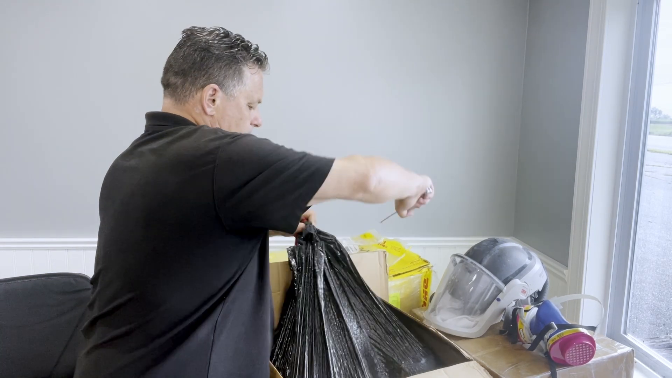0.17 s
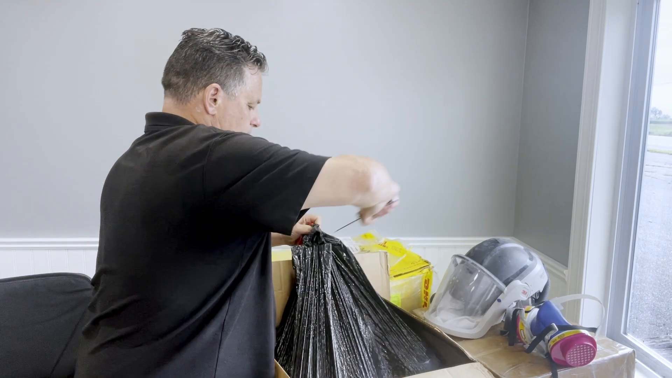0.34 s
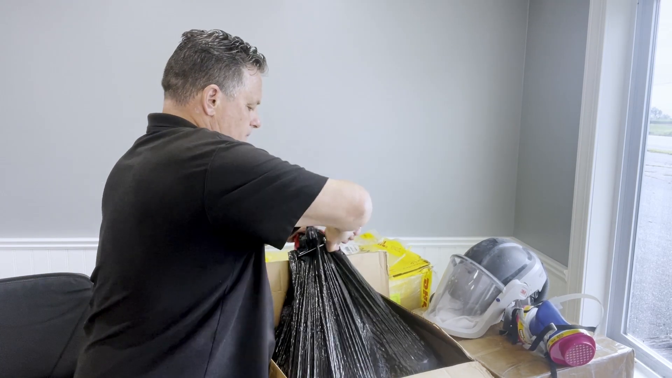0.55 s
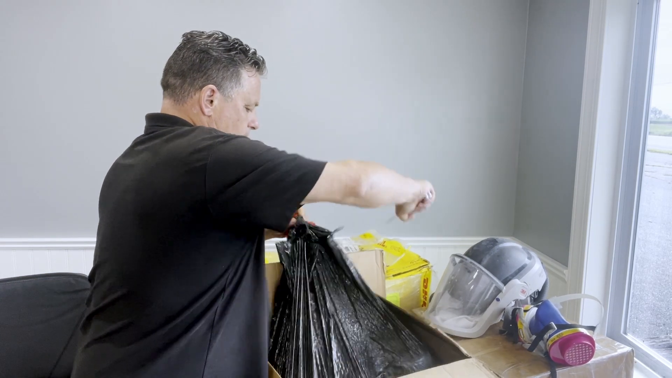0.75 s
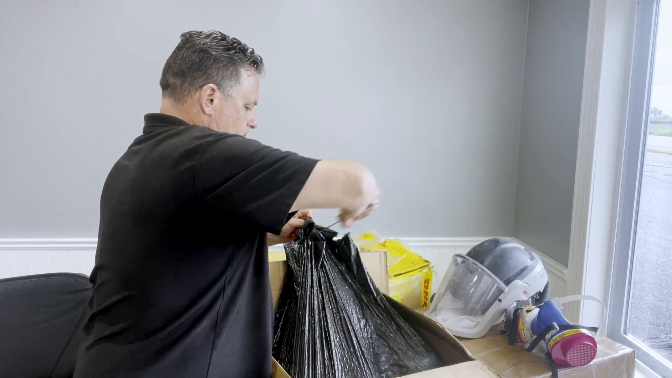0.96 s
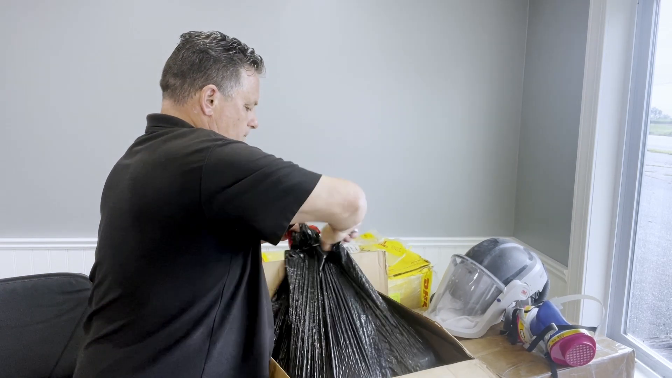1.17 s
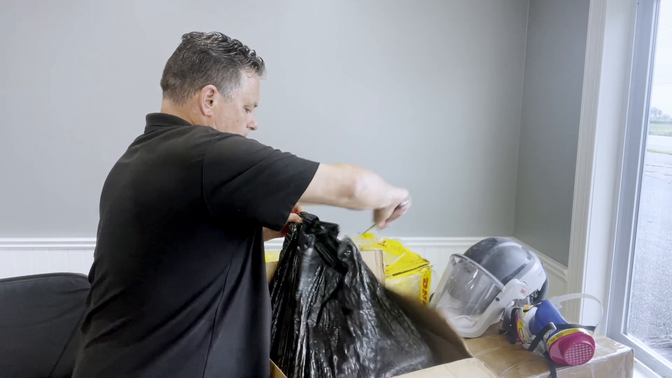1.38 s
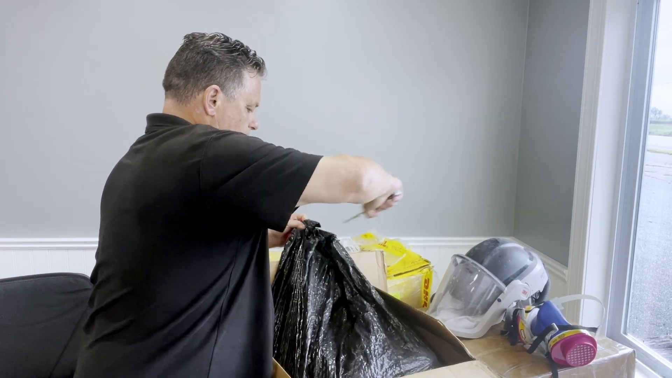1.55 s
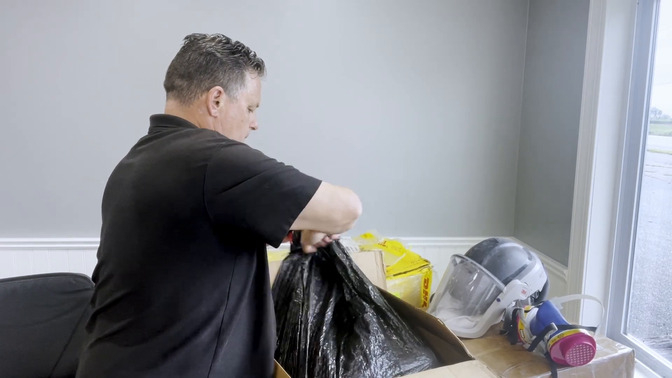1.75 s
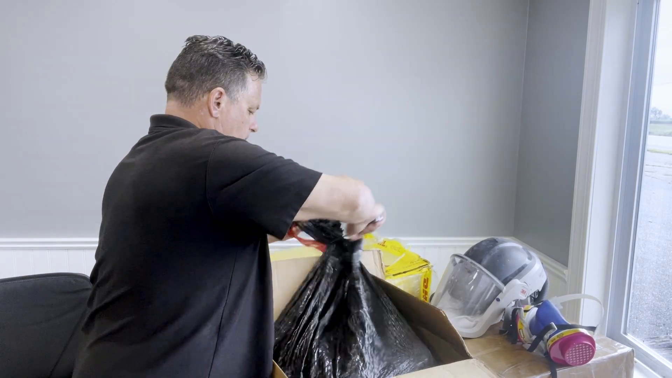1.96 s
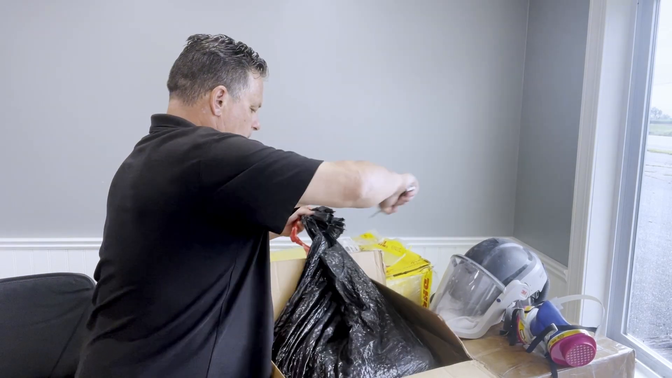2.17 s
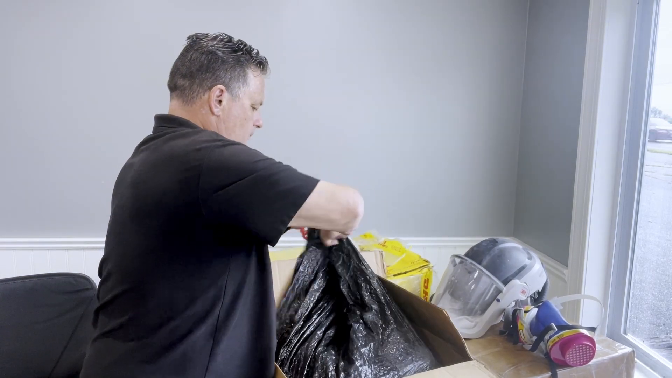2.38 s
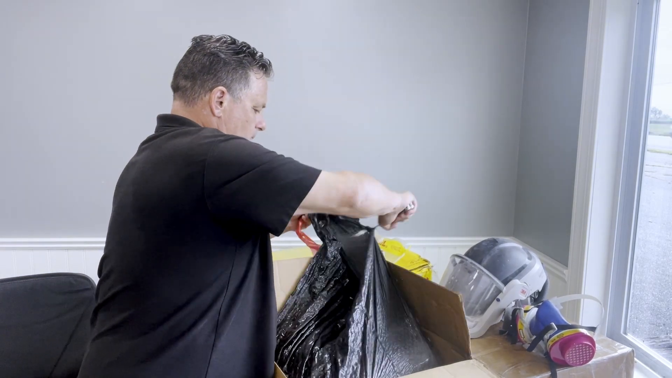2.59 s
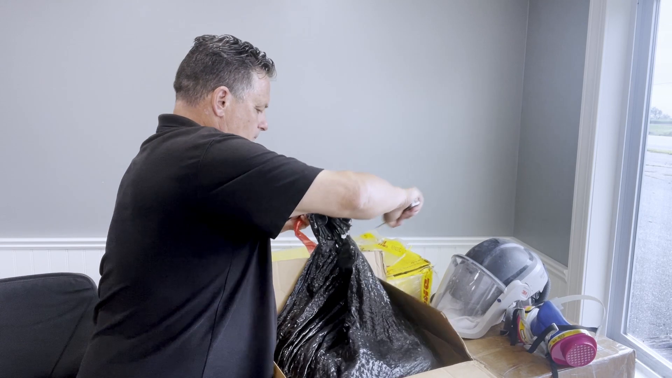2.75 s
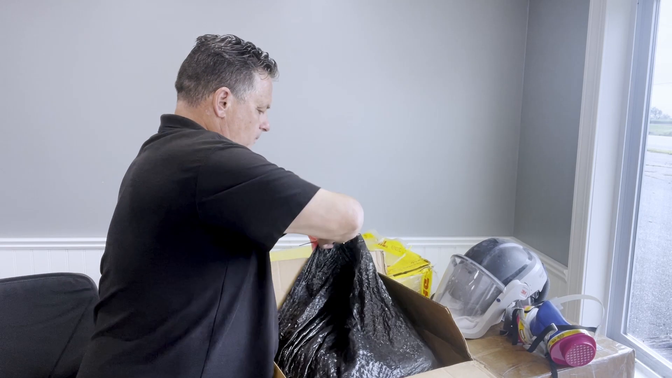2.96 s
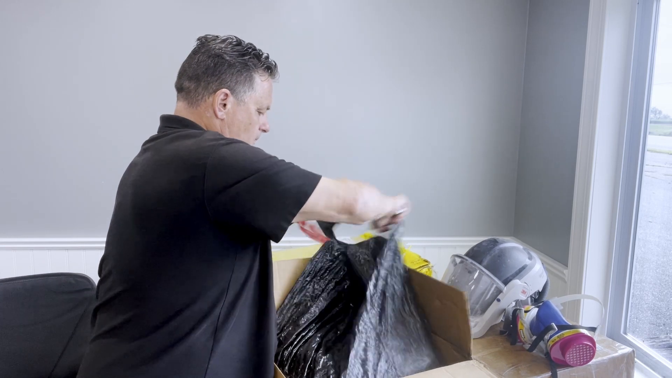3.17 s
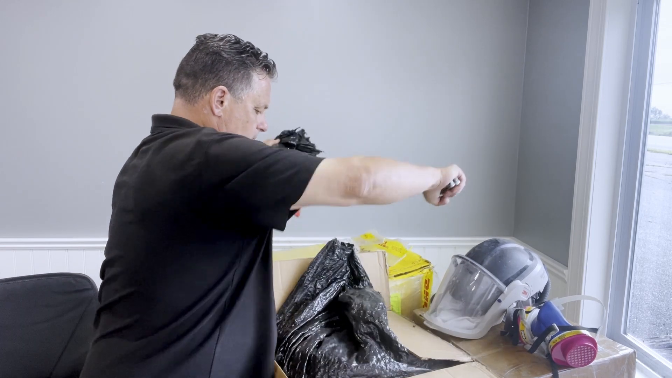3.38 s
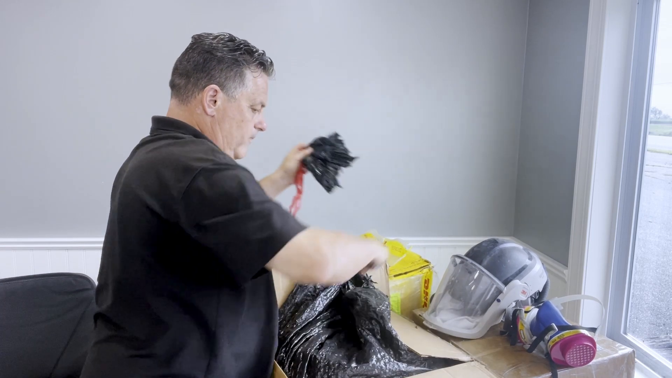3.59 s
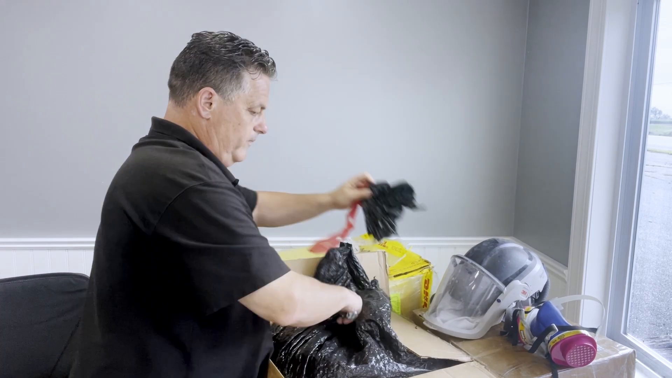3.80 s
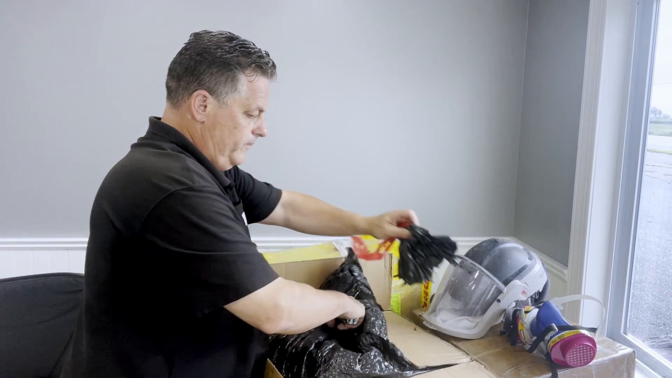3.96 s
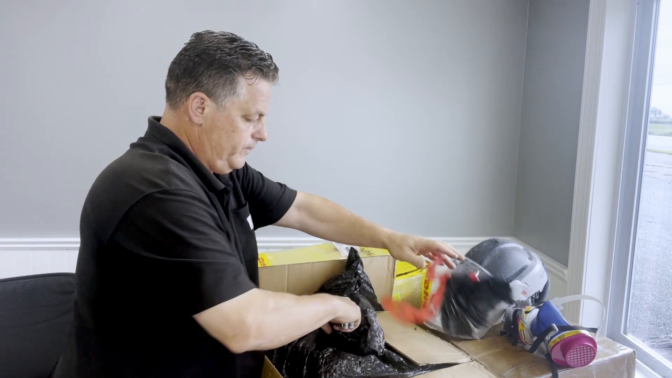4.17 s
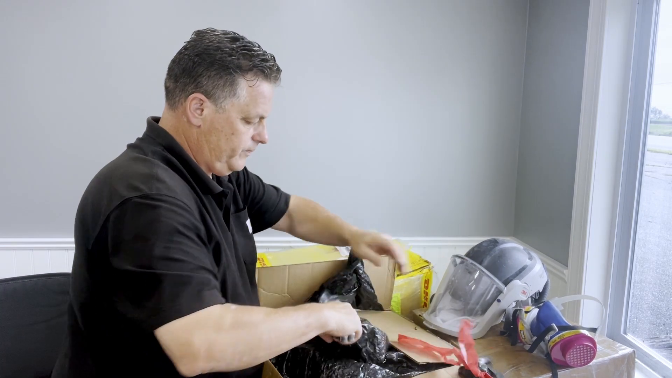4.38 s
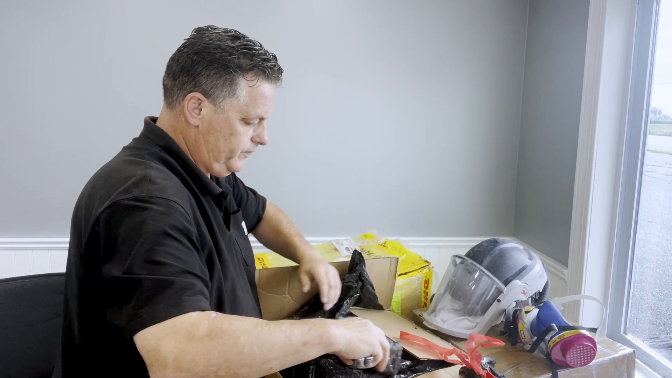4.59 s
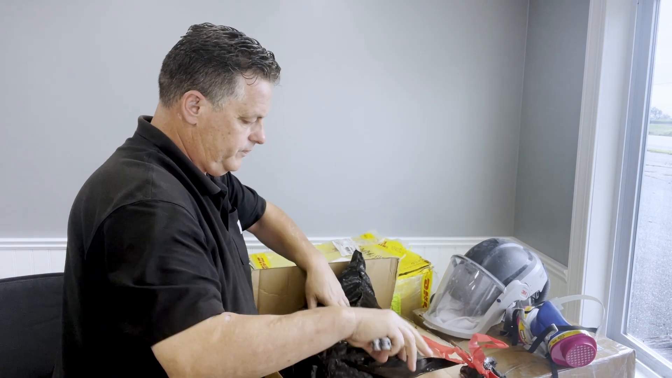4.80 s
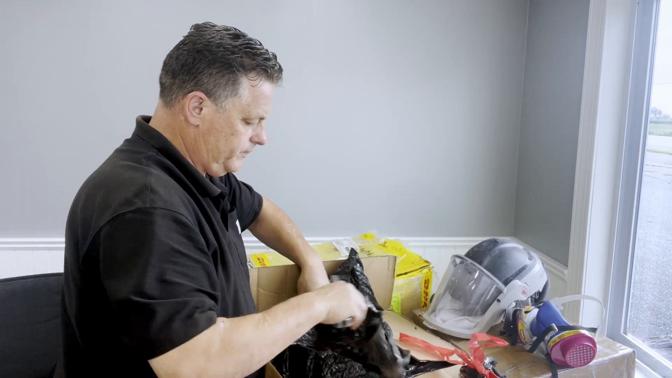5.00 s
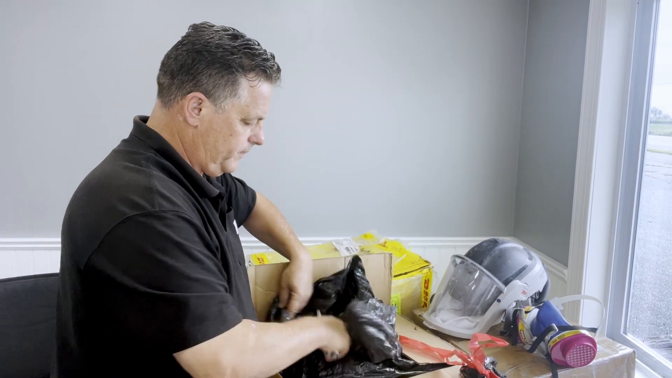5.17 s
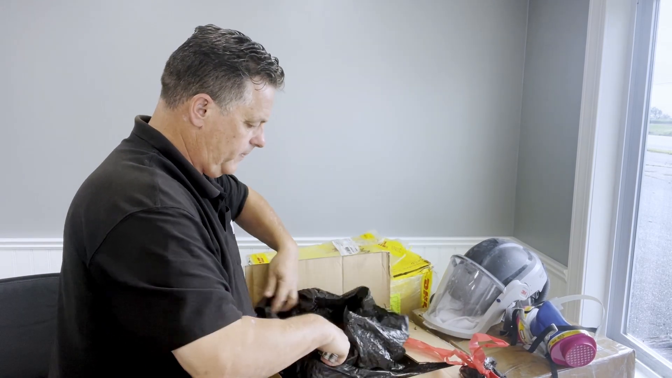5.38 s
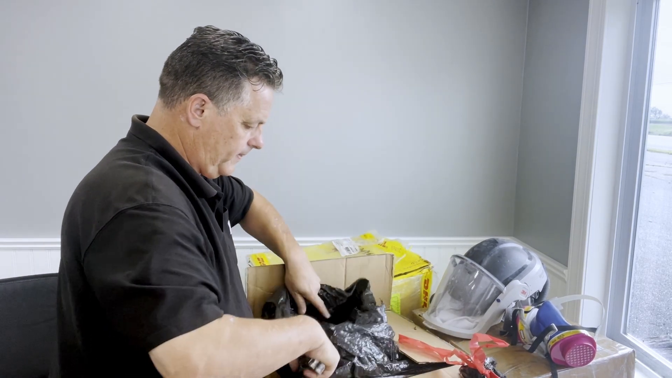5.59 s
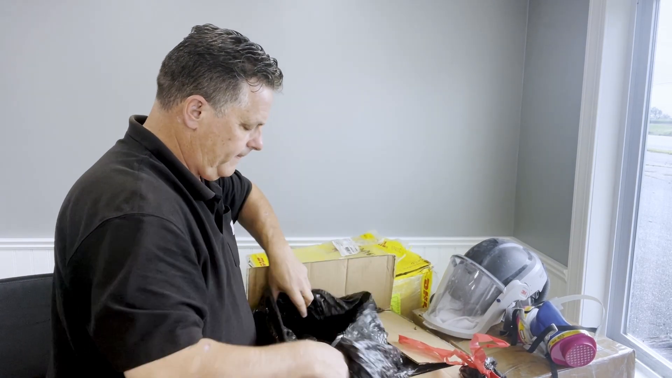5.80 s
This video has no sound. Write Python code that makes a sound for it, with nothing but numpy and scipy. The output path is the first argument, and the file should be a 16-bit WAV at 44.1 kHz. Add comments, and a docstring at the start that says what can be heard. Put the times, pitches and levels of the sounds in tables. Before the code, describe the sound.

Close stereo microphones catch a thin plastic bag tugged about every 0.6 seconds, six times. Each tug crackles, snaps tight with a hollow thump and flaps loose. The torn-off knot then taps a cardboard box, and quiet crinkling follows as the bag is opened. Small quiet room, faint ventilation.

```python
"""A thin plastic trash bag is tugged open six times in a small quiet room, then handled gently. Tugs: dense
pops of buckling creases, flapping folds, slaps and drumlike tones of taut film, pumped air. Hands and bag bump
a cardboard box; a torn-off knot rings it as decaying modes. Ventilation rumbles faintly under a steady hiss;
the bag is a little to the right of a closely spaced microphone pair."""
import sys
import numpy as np
from scipy import signal
from scipy.fft import rfft, irfft, next_fast_len
from scipy.io import wavfile

SR = 44100
rng = np.random.default_rng(int(sys.argv[2]) if len(sys.argv) > 2 else 0)


def to_wav(sig):
    """Store sig (one row per channel, or 1-D mono) as 16-bit WAV at the path in sys.argv[1].

    Samples outside -1..1 are clipped; the rate is SR.
    """
    pcm = np.clip(np.atleast_2d(sig), -1, 1) * 32767
    pcm = np.round(pcm).astype(np.int16)
    wavfile.write(sys.argv[1], SR, pcm.T)  # frames by channels


N = 257612
TIME = np.arange(N) / SR
PADDED = next_fast_len(N + SR, True)
FREQS = np.fft.rfftfreq(PADDED, 1 / SR)
PATCHES = np.arange(6)[:, None]

# spectrum of small creases buckling: freq_hz, relative_db
CREASE_SPECTRUM = [(500, -25), (1500, -2), (2700, 1), (4000, 0), (5600, 3), (8000, 1), (11500, 0),
                   (14000, -2.5), (15800, -6)]
# spectrum of taut film slapping, higher than slack film flaps: freq_hz, relative_db
SLAP_SPECTRUM = [(80, -29), (200, -2.5), (300, -1), (430, 4), (650, 2.5), (1000, -4.5), (1650, -7),
                 (2800, -7.5), (5000, -16), (12000, -52)]


def from_db(db):
    """Decibels to amplitude gain."""
    return 10 ** (np.asarray(db) / 20)


def rms_one(x):
    """Scale to unit power."""
    return x / np.sqrt(np.mean(x ** 2) + 1e-20)


def filtered(x, response):
    """Apply a frequency response by zero-padded FFT."""
    return irfft(rfft(x, PADDED) * response, PADDED)[..., :N]


def colour(points):
    """Causal (minimum-phase) response through (Hz, dB) points, by folding the cepstrum."""
    hz, db = np.transpose(points)
    level_db = np.interp(np.log(FREQS + 1), np.log(hz), db)
    cepstrum = irfft(np.log(from_db(level_db)), PADDED)
    cepstrum[1:PADDED // 2] *= 2
    cepstrum[PADDED // 2 + 1:] = 0
    return np.exp(rfft(cepstrum))


def bells(rows):
    """Response of a chain of second-order resonant peaks or dips."""
    response = 1
    for hz, width_hz, gain_db in rows:
        damping = 1j * FREQS * width_hz
        band = damping / (hz ** 2 - FREQS ** 2 + damping)
        response = response * (1 + (from_db(gain_db) - 1) * band)
    return response


def voiced(x, envelope, response):
    """Unit-power noise or pops, shaped by an envelope, ring through a response of unit power."""
    return filtered(x * envelope, response / np.sqrt(np.mean(np.abs(response) ** 2)))


def drift(knots_per_s):
    """Random level joined by straight lines between knots; unit power."""
    knots = rng.standard_normal(N // 20)
    return rms_one(np.interp(TIME * knots_per_s, np.arange(len(knots)), knots))


def buckles(per_s, spread_db, clump_db):
    """Tiny pops of buckling film: random moments, uneven sizes, strength varying in clumps; unit power."""
    chance = np.clip(per_s / SR, 1e-4, 1)
    size_db = spread_db * np.minimum(rng.exponential(1, N), 4)
    sizes = from_db(size_db) * rng.choice([-1, 1], N)
    # dividing by sqrt(chance) keeps power independent of rate
    pops = (rng.random(N) < chance) * sizes / np.sqrt(chance)
    return rms_one(pops * from_db(clump_db * drift(knots_per_s=210)))


def avalanches(starts_s, levels_db, lengths_s, rise_s):
    """Envelope of cascades of pops that swell almost at once and fall 60 dB over their length."""
    power = np.zeros(N)
    for start_s, level_db, length_s in zip(starts_s, levels_db, lengths_s):
        at = int(start_s * SR)
        age_s = TIME[:min(N - at, SR // 2)]
        rise = 1 - np.exp(-age_s / rise_s)
        power[at:at + len(age_s)] += (from_db(level_db - 60 * age_s / length_s) * rise) ** 2
    return np.sqrt(power)


def dealt(x):
    """Deal each sample to one of several patches of the film: patches x N."""
    return x * (rng.integers(0, len(PATCHES), N) == PATCHES)


def background_noise():
    """Faint ventilation rumble and a steady hiss: coloured noise, partly shared between the channels."""
    # freq_hz, relative_db
    spectrum = [(20, -16), (40, -24), (60, -2), (85, -0.5), (125, -15.5), (240, -17.5), (500, -28),
                (1500, -30), (5000, -44), (15500, -52)]
    air = rng.standard_normal(N) + 0.95 * rng.standard_normal((2, N))
    return voiced(air, from_db(-51.5), colour(spectrum))


def bumps(swell_s):
    """Hands and bag against the box: padded, damped sines that swell and die away."""
    # start_s, level_db, pitch_hz
    rows = [(3.599, -37, 75), (3.844, -25.5, 74), (3.818, -37.5, 370), (4.1, -39, 235), (5.693, -34.5, 100),
            (5.69, -40, 225), (5.715, -41, 160), (5.749, -32, 85)]
    out = np.zeros(N)
    for start_s, level_db, pitch_hz in rows:
        age_s = np.maximum(TIME - start_s, 0)
        swell = age_s / swell_s * np.exp(1 - age_s / swell_s)
        out += from_db(level_db) * swell * np.sin(2 * np.pi * pitch_hz * age_s)
    return out


def knot_landing(knock_db, crush_db):
    """The falling knot rings the modes of the cardboard while its crumpled plastic crackles."""
    # start_s, base_level_db (knock_db and crush_db add to it)
    landings = [(4.26, -31), (4.271, -41)]
    # modes of the cardboard: pitch_hz, relative_db, t60_s
    modes = [(426, -13, .08), (558, 0.5, 0.11), (686, -7, .08), (830, -3, 0.044), (1060, 2, .029),
             (1220, -1, 0.046), (1680, -14, .023)]
    starts_s, base_db = np.transpose(landings)
    taps = np.zeros(N)
    taps[(starts_s * SR).astype(int)] = from_db(base_db + knock_db)
    age_s = TIME[:SR // 3]
    ring = sum(from_db(db - 60 * age_s / t60_s) * np.sin(2 * np.pi * hz * age_s)
               for hz, db, t60_s in modes)
    crush = avalanches(starts_s, base_db + crush_db, [.04] * len(starts_s), rise_s=0.0011)
    crumple = voiced(rng.standard_normal(N), crush, colour(CREASE_SPECTRUM))
    crumple += voiced(rng.standard_normal(N), crush, colour(SLAP_SPECTRUM))
    return filtered(taps, rfft(ring, PADDED)) + crumple


def drums():
    """Panels pulled tight ring like drumheads: each a decaying sine at its own pitch."""
    # start_s, level_db, pitch_hz, t60_s
    panels = [(0.722, -25.5, 119, 0.28), (1.382, -21, 375, 0.25), (2.041, -17, 90, 0.054),
              (2.085, -21, 121, 0.13), (2.604, -14.5, 1510, 0.047), (2.604, -14.5, 365, 0.066),
              (2.604, -20.5, 111.5, 0.24), (3.205, -17.5, 109.7, 0.3)]
    out = np.zeros(N)
    for start_s, level_db, pitch_hz, t60_s in panels:
        age_s = np.clip(TIME - start_s, 0, 2)
        out += from_db(level_db - 60 * age_s / t60_s) * np.sin(2 * np.pi * pitch_hz * age_s)
    return out


def pull(taut_s, hold_s, rise_db_per_s, fall_db_per_s):
    """Gain that swells until the film is taut, stays while it is held and fades as it goes slack."""
    before_s = np.maximum(taut_s - TIME, 0)
    after_s = np.maximum(TIME - taut_s - hold_s, 0)
    return from_db(-rise_db_per_s * before_s - fall_db_per_s * after_s)


def handwork():
    """Strength of crinkle, flexing and pumped air: tugs plus gentle handling, summed in power."""
    # a hand gathers the film, pulls it taut, holds it and lets go: taut_s, gather_s (before taut_s),
    # hold_s, slack_s (folds fall 60 dB), creases gather_db, crinkle_db (pulled), settle_db,
    # folds stir_db (gathered), flex_db (pulled)
    tugs = [(0.136, 0.2, 0.018, 0.58, -43.5, -28, -51.5, -43.5, -30.5),
            (0.734, 0.26, 0.023, 0.63, -39, -28.5, -46.5, -45.5, -29),
            (1.372, 0.33, 0.057, 0.62, -41, -30, -48, -41, -29.5),
            (1.971, 0.22, .11, 0.53, -37.5, -32, -57, -43, -29.5),
            (2.581, 0.28, .1, 0.58, -40, -31.5, -48.5, -46, -30.5),
            (3.16, 0.13, .018, 0.79, -36.5, -30, -49.5, -61, -31.5)]
    # air pumped by each tug: start_s, hold_s, level_db
    puffs = [(0.138, 0.034, -28.5), (0.733, 0.19, -33.5), (1.27, 0.17, -32), (2.013, 0.052, -26),
             (2.526, 0.11, -30), (3.203, 0.079, -27.5)]
    # gentle handling, the knot lifted away: time_s, crinkle_db, flex_db (both before the gains below)
    lifting = [(3.62, -76.5, -78), (3.776, -62, -63), (3.834, -58, -50), (3.966, -49.5, -50),
               (4.132, -59.5, -63), (4.24, -55, -58)]
    # then the bag's mouth spread: time_s, crinkle_db, flex_db (both before the gains below)
    spreading = [(4.31, -51.5, -49.5), (4.688, -52, -54.5), (4.726, -55.5, -56), (4.77, -50.5, -51.5),
                 (4.952, -60.5, -58.5), (5.094, -49.5, -52.5), (5.152, -53.5, -55.5), (5.31, -47.5, -48),
                 (5.57, -49, -49.5), (5.652, -53.5, -57), (5.664, -50.5, -66), (5.698, -54, -52.5),
                 (5.784, -52.5, -55), (5.84, -49.5, -52.5)]
    gentle_crinkle_db, gentle_flex_db, gentle_air_db = 5.5, 3, 1
    grip_s, gather_rise_db_per_s = 0.065, 17.5
    crinkle_rise_db_per_s, crinkle_fall_db_per_s, settle_fall_db_per_s = 238, 297, 35
    flex_rise_db_per_s = 156
    air_rise_db_per_s, air_fall_db_per_s = 138, 76

    times_s, *columns = np.transpose(list(lifting) + list(spreading))
    crinkle, flex = [np.interp(TIME, times_s, from_db(column), left=0) for column in columns]
    creases = [crinkle * from_db(gentle_crinkle_db)]
    folds = [flex * from_db(gentle_flex_db)]
    air = [flex * from_db(gentle_air_db)]  # gently moved air follows the folds
    for taut_s, gather_s, hold_s, slack_s, gather_db, crinkle_db, settle_db, stir_db, flex_db in tugs:
        grip = np.clip((TIME - taut_s + gather_s) / grip_s, 0, 1)  # fingers close on the film
        gather = grip * pull(taut_s, hold_s, gather_rise_db_per_s, crinkle_fall_db_per_s)
        stretch = pull(taut_s, hold_s, crinkle_rise_db_per_s, crinkle_fall_db_per_s)
        settle = pull(taut_s, hold_s, crinkle_rise_db_per_s, settle_fall_db_per_s)
        flap = grip * pull(taut_s, hold_s, flex_rise_db_per_s, 60 / slack_s)
        creases += [from_db(gather_db) * gather, from_db(crinkle_db) * stretch]
        creases.append(from_db(settle_db) * settle)
        folds += [from_db(stir_db) * gather, from_db(flex_db) * flap]
    for start_s, hold_s, level_db in puffs:
        air.append(from_db(level_db) * pull(start_s, hold_s, air_rise_db_per_s, air_fall_db_per_s))
    return [np.sqrt(sum(part ** 2 for part in parts) + 1e-18) for parts in (creases, folds, air)]


def billowing_air(billow, hollow):
    """Enclosed air billows as low noise; squaring weak movement away lets only brisk movement pump."""
    # freq_hz, relative_db
    spectrum = [(20, -7), (38, -24), (56, -2), (80, 0.5), (115, -2), (160, -6.5), (240, -12.5),
                (400, -11.5), (1500, -107.5)]
    pumping = billow ** 2 / (billow + from_db(-47.5))
    return voiced(dealt(rng.standard_normal(N)), pumping, colour(spectrum) * hollow)


def flapping_folds(flex, per_s, hollow):
    """Large folds buckle more rarely and lower than creases."""
    # freq_hz, relative_db
    spectrum = [(70, -50), (170, -5.5), (260, -1.5), (420, -1.5), (600, -0.5), (850, -3.5), (1100, -4),
                (1600, -10.5), (2800, -9), (5000, -20.5), (12000, -57)]
    pops = buckles(per_s / 5, spread_db=0.5, clump_db=1.5)
    return voiced(dealt(pops), flex, colour(spectrum) * hollow)


def bag(lone_db):
    """Creases crinkle, folds flap and slap, air billows; harder pulling buckles more creases a second."""
    # the film jerks taut: start_s, crease_crack_db, fold_slap_db, length_s (60 dB fall)
    snaps = [(.111, -25, -24, 0.19), (0.121, -20, -19, 0.16), (0.709, -23.5, -21.5, 0.13),
             (0.718, -18.5, -18, 0.11), (.74, -20, -14, 0.056), (1.105, -47, -56, .047),
             (1.338, -20, -15.5, 0.082), (1.357, -27, -15.5, 0.045), (1.376, -18, -12.5, .1),
             (1.408, -20, -22.5, 0.079), (1.946, -17, -14, 0.055), (1.981, -25, -30, 0.14),
             (2.005, -20.5, -29, 0.058), (2.039, -24, -17.5, 0.053), (2.081, -20, -16.5, 0.097),
             (2.488, -29, -27, 0.19), (2.553, -32, -29, 0.23), (2.576, -31.5, -27, 0.089),
             (2.598, -14.5, -13, 0.075), (2.606, -26, -13.5, 0.035), (2.692, -23.5, -22, 0.088),
             (3.145, -34.5, -29, 0.11), (3.206, -20.5, -21, 0.23), (3.666, -54, -68, .025),
             (4.323, -39.5, -42, .1)]
    # standing waves between bag, box and walls: freq_hz, width_hz, gain_db
    standing_waves = [(164, 13, -2.5), (230.3, 42, 7), (322, 23, -2), (383, 57, 3.5), (684, 23, 1.5),
                      (923, 21, 0), (1550, 270, 2.5)]
    handled_crinkle, flex, billow = handwork()
    starts_s, cracks_db, slaps_db, lengths_s = np.transpose(snaps)
    crinkle = np.hypot(handled_crinkle, avalanches(starts_s, cracks_db, lengths_s, rise_s=.0012))
    per_s = 1800 + 24000 * np.sqrt(crinkle / crinkle.max())

    # single stiff creases pop out of the rustle, capped under hard pulls
    lone = buckles(70, spread_db=-0.9, clump_db=1) * from_db(lone_db)
    lone *= np.minimum(handled_crinkle, from_db(-26))
    pops = buckles(per_s, spread_db=2.0, clump_db=1.6) + lone / crinkle
    creases = voiced(dealt(pops), crinkle, colour(CREASE_SPECTRUM))

    hollow = bells(standing_waves)
    slap_pops = buckles(per_s, spread_db=1.5, clump_db=2.5)
    slap_envelope = avalanches(starts_s, slaps_db, lengths_s, rise_s=0.0011)
    slap = voiced(dealt(slap_pops), slap_envelope, colour(SLAP_SPECTRUM) * hollow)
    return creases + flapping_folds(flex, per_s, hollow) + slap + billowing_air(billow, hollow)


def room(sources, early_db, early_s, lag_spread_s):
    """Direct sound reaches the right microphone first; every source spot has its own reflections and tail."""
    # reflected against direct sound: freq_hz, level_db
    reflected = [(60, -13), (250, 2.5), (600, -1), (1200, 0), (3500, 0.5), (6000, 3.5), (9000, -5),
                 (16000, 0.5)]
    t60_s, left_lag_s = 0.54, .00008
    age_s = TIME[:SR * 3 // 4]
    decay = from_db(-60 * age_s / t60_s) + from_db(early_db) * np.exp(-age_s / early_s)
    decay *= age_s > .0015  # gap before the first reflection
    wet, out = colour(reflected), 0
    places = np.linspace(-1, 1, len(sources) + 2)[1:-1]
    for source, place in zip(sources, places):
        echoes = rng.standard_normal((2, len(age_s))) * decay / np.sqrt(np.sum(decay ** 2))
        paths = wet * rfft(echoes, PADDED)
        paths[0] += np.exp(-2j * np.pi * FREQS * (left_lag_s + place * lag_spread_s))
        paths[1] += 1
        out = out + rfft(source, PADDED) * paths
    # keep direct plus reflected power at one in every band
    return irfft(out / np.sqrt(1 + np.abs(wet) ** 2), PADDED)[:, :N]


def scene():
    """Bag and box in the room, over faint rumble and hiss."""
    plastic = bag(lone_db=-8.5)
    knocks = bumps(swell_s=0.01) + knot_landing(knock_db=-5, crush_db=1.5) + drums()
    near = room(np.vstack([plastic, knocks]), early_db=3, early_s=.005, lag_spread_s=.000007)
    balance_db = [[-.5], [.4]]  # left, right
    return near * from_db(balance_db) + background_noise()


def record(dry):
    """The close pair reshapes the stereo width, its housing cancels two bands, deep bass and top are cut."""
    # pickup of the left-right difference: freq_hz, gain_db
    width = [(40, -12), (120, -4.5), (300, -3.5), (700, 4.5), (4000, -0.5), (10500, 1.5), (11800, -14),
             (13000, -14), (13900, -2), (16000, 1)]
    # bands cancelled by the microphone housing: freq_hz, width_hz, gain_db
    housing = [(2053, 534, -13.5), (4140, 860, -9)]
    low_cut_hz, high_cut_hz = 42, 15800
    mid, side = (dry[0] + dry[1]) / 2, (dry[0] - dry[1]) / 2
    side = filtered(side, np.abs(colour(width)))
    pair = filtered(np.array([mid + side, mid - side]), bells(housing))
    pair = signal.sosfilt(signal.butter(3, low_cut_hz, "high", fs=SR, output="sos"), pair)
    return signal.sosfilt(signal.ellip(12, .1, 90, high_cut_hz, fs=SR, output="sos"), pair)


dry = scene()
out = record(dry)
to_wav(out)
```